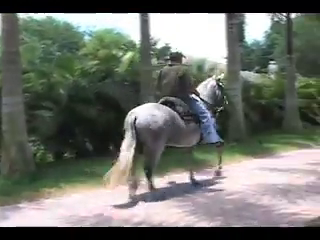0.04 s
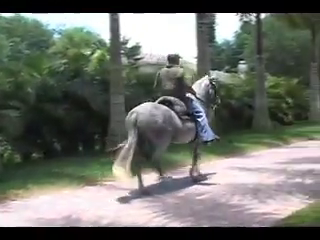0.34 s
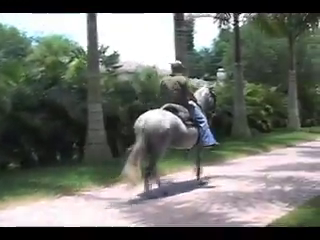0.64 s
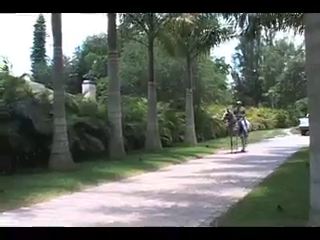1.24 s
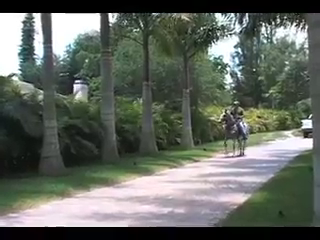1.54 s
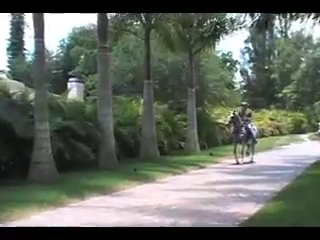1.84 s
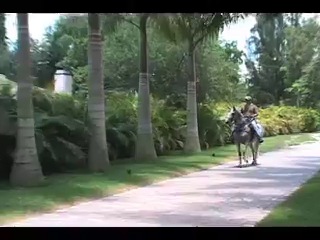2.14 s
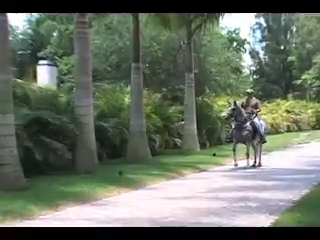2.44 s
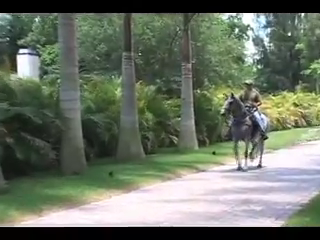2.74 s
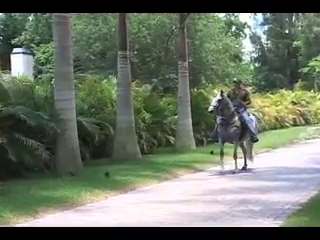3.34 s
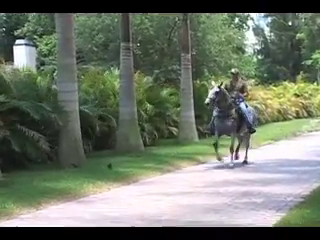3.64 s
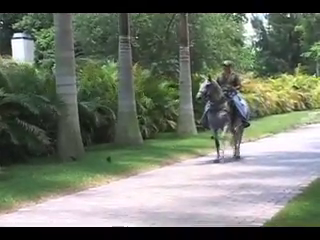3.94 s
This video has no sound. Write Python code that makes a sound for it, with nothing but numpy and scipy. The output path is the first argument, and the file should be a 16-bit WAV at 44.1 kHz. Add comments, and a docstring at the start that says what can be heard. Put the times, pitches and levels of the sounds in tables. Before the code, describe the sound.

A shod horse clops quickly along a paved driveway, close by with small scuffs, then abruptly faint and distant. A light breeze rumbles on the microphone, leaves hiss, and a far bird whistles once.

```python
"""Quick four-beat clops of a shod horse ambling on a paved driveway, close by; then the scene changes and the
horse is far off. Each hoof lands in two or three contacts: a hollow hoof knock, a crack of iron on stone, a
short ring. Shoes scuff; paving and trees scatter the clops into a short, diffuse echo. A breeze rumbles on the
microphone, leaves hiss and a far bird whistles once."""
import sys
import numpy as np
from scipy import signal
from scipy.fft import rfft, irfft, next_fast_len
from scipy.io import wavfile
from scipy.ndimage import map_coordinates

SR = 44100
rng = np.random.default_rng(int(sys.argv[2]) if len(sys.argv) > 2 else 0)


def inscribe(sig):
    """Save sig as 16-bit PCM at rate SR to the path in sys.argv[1].

    A 1-D sig is mono; a 2-D sig holds one channel per row.
    Samples are clipped to [-1, 1] before scaling.
    """
    pcm = np.round(np.clip(np.atleast_2d(sig).T, -1, 1) * 32767)
    wavfile.write(sys.argv[1], SR, pcm.astype(np.int16))


N = 176400


def amp(db):
    """Decibels to gain."""
    return 10 ** (np.asarray(db) / 20)


def unit(x):
    """Scale to rms 1."""
    return x / np.sqrt(np.mean(x ** 2) + 1e-20)


def burst(x):
    """Scale to the energy of one millisecond at rms 1."""
    return x * np.sqrt(SR / 1000 / (np.sum(x ** 2) + 1e-20))


def along(points, hz):
    """(Hz, value) points on a log axis."""
    f, v = np.transpose(points)
    return np.interp(np.log(hz + 1), np.log(f + 1), v)


def curves(rows):
    """One value per sample for each column after the time."""
    s, *cols = np.transpose(rows)
    return [np.interp(np.arange(N) / SR, s, c) for c in cols]


def fade(t, t60):
    """Exponential decay."""
    return np.exp(-np.log(1000) * t / t60)


def wobble(rate):
    """A smooth random curve, rate knots a second."""
    return map_coordinates(rng.standard_normal(int(N * rate / SR) + 4), [np.arange(N) * rate / SR])


def filtered(x, response):
    """x times a response of frequency."""
    m = next_fast_len(N + SR // 2)
    return irfft(rfft(x, m) * response(np.fft.rfftfreq(m, 1 / SR)), m)[:N]


def coloured(x, gain_db):
    """Causal colouring of a short sound; one dB value per FFT bin."""
    cep = irfft(np.log(amp(gain_db)))
    cep[1:len(x) // 2] *= 2
    cep[len(x) // 2 + 1:] = 0
    return irfft(rfft(x) * np.exp(rfft(cep)))


def noise(spectrum):
    """Coloured noise of rms 1."""
    return unit(filtered(rng.standard_normal(N), lambda hz: amp(along(spectrum, hz))))


MODE_SCATTER_DB, MODE_DETUNE = 2.5, .025


def ring(modes, t):
    """Damped modes, slightly different at every blow."""
    draws = rng.standard_normal((len(modes), 2))
    sound = 0
    for (hz, db, t60), (scatter, detune) in zip(modes, draws):
        tone = np.sin(2 * np.pi * hz * (1 + MODE_DETUNE * detune) * t)
        sound += amp(db + MODE_SCATTER_DB * scatter) * fade(t, t60) * tone
    return burst(sound)


# hoof modes: f/knock pitch, level/dB, t60/knock cycles
HOOF_MODES = [(1, 44, 23.5), (1.2, 17, 27), (.84, -42, 5.7), (.56, -44, 10), (.36, -40, 16), (.2, -18, 46)]
# iron shoe modes: f/Hz, level/dB, t60/s
SHOE_MODES = [(2428, 6.5, 0.0084), (2860, 3.5, 0.0072), (3900, -23, 0.01), (4783, 5, 0.015),
              (6486, 3, .011)]
# crack spectrum: f/Hz, level/dB
CRACK_SPECTRUM = [(150, -29.5), (300, -23), (450, -12), (700, -5.5), (1350, 4), (1900, -1), (2600, -3.5),
                  (3300, -0.5), (4300, 0.5), (6300, -3), (7400, -10), (11500, -12.5), (14000, -15.5)]
SNAP_T60_S, GRIT_T60_S, GRIT_DB, IMPACT_DB = 0.0015, 0.029, -18, -2
TILT_FROM_HZ, FLAT_HOOF_HZ, EDGE_DAMPING = 2280, 950, 0.84


def contact(knock_db, knock_hz, crack_db, tilt_db, ring_db, size=2048):
    """A shoe edge meets the paving: the hoof knocks, the iron cracks and crushes grit, the shoe rings."""
    t, hz = np.arange(size) / SR, np.fft.rfftfreq(size, 1 / SR)
    decay = fade(t, SNAP_T60_S) + amp(GRIT_DB) * fade(t, GRIT_T60_S)
    snap = burst(rng.standard_normal(size) * decay)
    impact = amp(IMPACT_DB) * burst(1. * (t == 0))
    hardness_db = tilt_db * np.log2(np.maximum(hz / TILT_FROM_HZ, 1))
    crack = burst(coloured(snap + impact, along(CRACK_SPECTRUM, hz) + hardness_db))
    # a flat hoof rings low and hollow; an edge knocks higher and dies sooner
    life = min(1, FLAT_HOOF_HZ / knock_hz) ** EDGE_DAMPING
    modes = [(ratio * knock_hz, db, life * cycles / knock_hz) for ratio, db, cycles in HOOF_MODES]
    return amp(knock_db) * ring(modes, t) + amp(crack_db) * crack + amp(ring_db) * ring(SHOE_MODES, t)


# hoof contacts: t/s, knock/dB, knock pitch/Hz, crack/dB, crack tilt/(dB/octave), shoe ring/dB
HOOF_CONTACTS = [(0.0299, -11, 1285, -5, -6, -37), (0.0344, -16.5, 1030, -48, -17, -22),
                 (0.0434, -16, 1010, -38, -2, -33), (0.1055, -6.5, 1090, -7, 2, -17.5),
                 (0.114, -19.5, 920, -15, 11, -13.5), (0.2343, -5.5, 1304, -9, 4, -30),
                 (0.2378, -10.5, 935, -9, -4.5, -40), (0.3078, -14.5, 1050, -7.5, 4.5, -10),
                 (0.3173, -15, 994, -24, -5, -14.5), (0.448, -11.5, 1330, -6, -1.5, -43),
                 (0.4556, -20, 1080, -22, -1, -22.5), (0.5192, -20, 1090, -25, -13, -21.5),
                 (0.5241, -57, 2140, -7, 26.5, -13), (0.5265, -9, 946, -11.5, 2.5, -36),
                 (0.6428, -9.5, 1220, -10, -4, -23), (0.6461, -13, 1040, -12, 4, -16),
                 (0.724, -12, 1110, -11, 1, -11), (0.7327, -10, 1034, -14, -7, -37),
                 (0.735, -18, 950, -25, 9, -19), (0.8453, -12, 1270, -23, 18, -25),
                 (0.8514, -13, 1016, -18.5, 3, -22), (0.8817, -23.5, 1470, -28.5, 4, -32),
                 (0.8878, -25.5, 1060, -30, -1, -27.5), (0.9774, -31.5, 800, -27, -8, -31.5),
                 (0.988, -41, 830, -45, 12, -35.5), (1.118, -24, 2020, -31, 1.5, -45),
                 (1.1313, -31, 1110, -28.5, 2.5, -30.5), (1.1893, -39, 1270, -32.5, -2, -49),
                 (1.1986, -31, 915, -21.5, 15, -31), (1.299, -30, 1560, -30.5, -1, -38.5),
                 (1.3091, -29.5, 990, -29, -1.5, -34.5), (1.4142, -50, 1530, -29.5, 0.5, -32),
                 (1.4207, -25.5, 956, -25.5, -0.5, -28.5), (1.5464, -34, 2040, -34, -2.5, -35.5),
                 (1.554, -29, 990, -26.5, 0.5, -35), (1.6395, -39, 1010, -32.5, 1, -51),
                 (1.6495, -31, 1006, -26, 4.5, -25.5), (1.7543, -36, 1950, -31.5, -2, -37),
                 (1.767, -35.5, 1070, -30.5, -0.5, -36), (1.8569, -23, 954, -25.5, -2.5, -30),
                 (1.866, -33, 910, -23.5, 5, -25.5), (1.8782, -31, 1020, -41, 12, -49),
                 (1.9558, -34, 1970, -32, -2, -49), (1.9634, -28.5, 1025, -28, -9, -32.5),
                 (2.0906, -30, 1090, -28.5, -2, -49), (2.1104, -35.5, 990, -38, -6, -33.5),
                 (2.183, -28.5, 1810, -41, -1, -58), (2.1931, -33, 1050, -33, -3.5, -52),
                 (2.3051, -25.5, 946, -24.5, 1, -25), (2.3146, -41, 910, -29.5, 4, -27.5),
                 (2.4151, -29, 1750, -35.5, -4.5, -57), (2.429, -25, 890, -29, 0, -42),
                 (2.5263, -38, 1840, -38, -20, -32), (2.5347, -26.5, 975, -27, -1, -32.5),
                 (2.6441, -36, 1280, -28.5, -7, -29.5), (2.6519, -30, 990, -30, 3.5, -32),
                 (2.751, -33.5, 1090, -28.5, 0.5, -25.5), (2.7615, -34, 1270, -32, 0, -40),
                 (2.8572, -49, 2010, -26, -2, -33), (2.8637, -34.5, 2000, -28.5, 15, -31),
                 (2.9608, -29, 960, -26, -0.5, -25), (2.9695, -22.5, 980, -23.5, 11.5, -26.5),
                 (3.065, -24, 1550, -32, 1.5, -62), (3.0734, -42, 1020, -29.5, 2, -29.5),
                 (3.1942, -27.5, 1000, -27.5, 1.5, -25.5), (3.3015, -37, 1150, -27, -6.5, -31),
                 (3.3079, -25, 940, -29.5, 5, -30), (3.393, -25.5, 1010, -25.5, 9, -22.5),
                 (3.4058, -26, 1015, -28, -5, -58), (3.506, -32.5, 1770, -36, -1, -31.5),
                 (3.513, -24, 1030, -26.5, -6, -41), (3.6213, -29, 767, -29.5, -0.5, -28),
                 (3.6326, -36, 827, -27.5, 7, -30), (3.711, -31, 930, -30.5, -21, -47),
                 (3.7169, -25.5, 990, -29.5, 3, -30), (3.8371, -27, 1005, -30.5, 2.5, -46),
                 (3.8486, -30, 990, -30.5, -0.5, -36), (3.9059, -31.5, 1400, -38, -7, -29),
                 (3.9126, -28.5, 1780, -26, 1, -38)]
FAR_FROM_S = .8595
NEAR_PATH_DB, FAR_PATH_DB = (-21.5, -14), (-1, -4)  # paving, garden; re direct sound


def hooves():
    """Every contact with its echo; the near echoes cut off where the scene changes to the distant horse."""
    near, far = np.zeros((2, N + SR))
    for start_s, *blow in HOOF_CONTACTS:
        track, path_db = (near, NEAR_PATH_DB) if start_s < FAR_FROM_S else (far, FAR_PATH_DB)
        clop = signal.fftconvolve(contact(*blow), garden_path(*path_db))
        track[round(start_s * SR):][:len(clop)] += clop
    return near[:N] * (np.arange(N) / SR < FAR_FROM_S) + far[:N]


# scuff strokes: t/s, level/dB
SCUFF_STROKES = [(0.011, -44), (0.059, -38.5), (0.149, -34), (0.269, -32), (0.353, -38.5), (.476, -37),
                 (0.563, -36), (.673, -31.5), (0.775, -32.5), (.935, -44), (2.163, -51), (2.455, -48),
                 (3.67, -45.5)]
# scuff spectrum: f/Hz, density/dB
SCUFF_SPECTRUM = [(150, -14), (650, -3.5), (1050, 6), (1700, -11), (2450, -3.5), (3300, -10), (6300, -8.5),
                  (7500, -14.5), (13500, -24)]
SCUFF_SIGMA_S, SCUFF_GRAIN_DB = 0.01, 4


def scuffs():
    """Gritty shoe scrapes on stone; the first stroke is the faint fading echo of an earlier step."""
    t = np.arange(N) / SR
    strokes = sum(amp(db) * np.exp(-.5 * ((t - s) / SCUFF_SIGMA_S) ** 2) for s, db in SCUFF_STROKES)
    grains = rng.standard_normal(N) * amp(SCUFF_GRAIN_DB * wobble(900))
    return strokes * unit(filtered(grains, lambda hz: amp(along(SCUFF_SPECTRUM, hz))))


# garden echo decay: f/Hz, t60/s
GARDEN_DECAY = [(200, 0.55), (1000, 0.22), (5000, 0.4), (13000, 0.32)]
# garden echo spectrum: f/Hz, level/dB
GARDEN_SPECTRUM = [(200, 6.5), (600, -6.5), (1000, 0.5), (1600, -3), (2500, -3.5), (4700, -1.5),
                   (6000, 0.5), (13000, 0)]
PAVING_T60_S, FAR_TREES_T60_S, FAR_TREES_DB = 0.024, 0.49, -18.5


def garden_path(paving_db, garden_db, size=32768):
    """Direct sound, quick scatter off the paving and a diffuse tail off trunks and leaves."""
    hz, frame_s, bands = signal.stft(rng.standard_normal(size), SR, nperseg=256)
    decay = fade(frame_s, along(GARDEN_DECAY, hz)[:, None])
    decay += amp(FAR_TREES_DB) * fade(frame_s, FAR_TREES_T60_S)
    colour = amp(along(GARDEN_SPECTRUM, hz))[:, None]
    tail = signal.istft(bands * decay * (frame_s > 0) * colour, SR, nperseg=256)[1][:size]
    t = np.arange(size) / SR
    ground = rng.standard_normal(size) * fade(t, PAVING_T60_S)
    early = (t == 0) + amp(paving_db) * ground / np.linalg.norm(ground)
    return early / np.linalg.norm(early) + amp(garden_db) * tail / np.linalg.norm(tail)


# gust envelope: t/s, level/dB
GUSTS = [(0, -49.5), (.4, -51), (.52, -38), (.82, -58), (.87, -35), (.99, -32), (1.08, -30), (1.13, -42),
         (1.24, -47.5), (1.32, -32), (1.5, -41), (1.75, -45), (2.2, -34), (2.42, -42.5), (2.62, -36),
         (2.75, -42.5), (2.93, -48), (3.0, -39.5), (3.24, -38), (3.35, -27.5), (3.45, -32.5), (4, -33)]
# rumble spectrum: f/Hz, density/dB
RUMBLE_SPECTRUM = [(20, -22), (35, -6), (62, 1.5), (100, -1.5), (150, -9), (220, -19.5), (400, -41),
                   (900, -74)]
# hiss spectrum: f/Hz, density/dB
HISS_SPECTRUM = [(30, 18), (120, -3), (300, 12), (600, 4.5), (1000, 7), (1600, -2), (3000, -5),
                 (6200, -8.5), (8000, -12.5), (13500, -21)]
HISS_DB, FLUTTER_DB = -52.5, 2


def breeze():
    """Gusts flutter on the microphone over a steady hiss of leaves and distance."""
    gust_db, = curves(GUSTS)
    rumble = unit(amp(FLUTTER_DB * wobble(19)) * noise(RUMBLE_SPECTRUM))
    return amp(gust_db) * rumble + amp(HISS_DB) * noise(HISS_SPECTRUM)


# bird whistle: t/s, f/Hz, level/dB
WHISTLE = [(1.88, 3800, -72), (1.92, 3540, -54), (1.96, 3440, -49), (2.03, 3370, -55), (2.1, 3400, -62),
           (2.28, 3410, -67)]
WAVER_HZ, BIRD_PATH_DB = 62, (-2, 4)  # path: paving, garden


def bird():
    """One faint, falling, wavering whistle, heard mostly by way of the trees."""
    hz, db = curves(WHISTLE)
    t = np.arange(N) / SR
    phase = 2 * np.pi * np.cumsum(hz + WAVER_HZ * wobble(100)) / SR
    gate = (t > WHISTLE[0][0]) * (t < WHISTLE[-1][0])
    whistle = amp(db - BIRD_PATH_DB[1]) * np.sin(phase) * gate
    return signal.fftconvolve(whistle, garden_path(*BIRD_PATH_DB))[:N]


def scene():
    """Horse, breeze and bird in mono."""
    return (hooves() + scuffs() + breeze() + bird())[None]


# microphone response: f/Hz, gain/dB
MIC_RESPONSE = [(4200, -0.5), (4850, -3.5), (5400, -0.5), (6400, -2.5), (7300, -4), (8050, 3), (8900, -8),
                (9850, 3), (10700, -2.5), (11600, 5), (12400, -0.5), (13500, -1)]
TOP_HZ, CEILING = 13900, .86


def record(dry):
    """The microphone ripples the treble; peaks are rounded off and the band is limited."""
    lowpass = lambda hz: 1 / np.sqrt(1 + (hz / TOP_HZ) ** 300)
    heard = filtered(dry[0], lambda hz: amp(along(MIC_RESPONSE, hz)) * lowpass(hz))
    rounded = heard / (1 + np.abs(heard / CEILING) ** 6) ** (1 / 6)
    return filtered(rounded, lowpass)[None]


dry = scene()
out = record(dry)
inscribe(out)
```